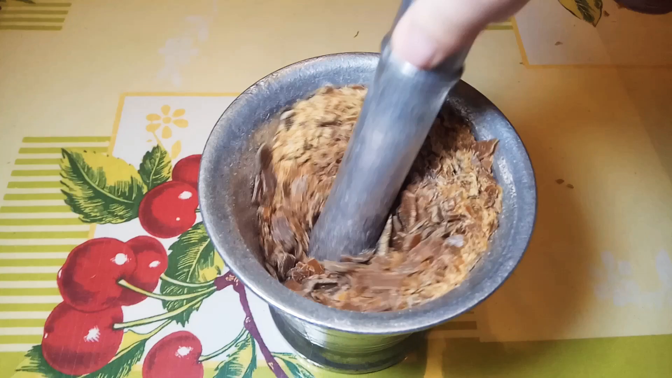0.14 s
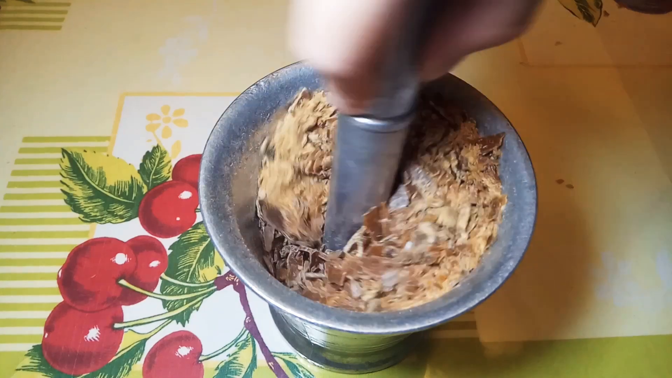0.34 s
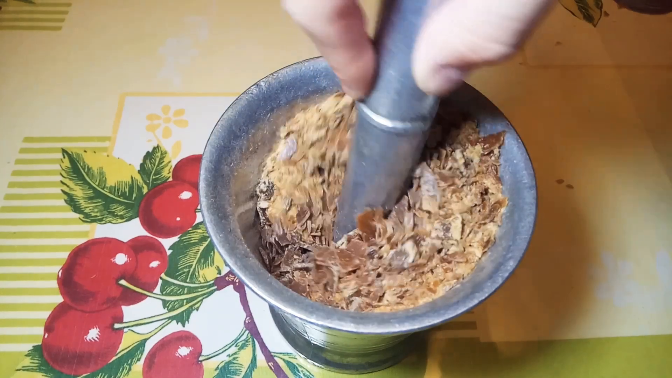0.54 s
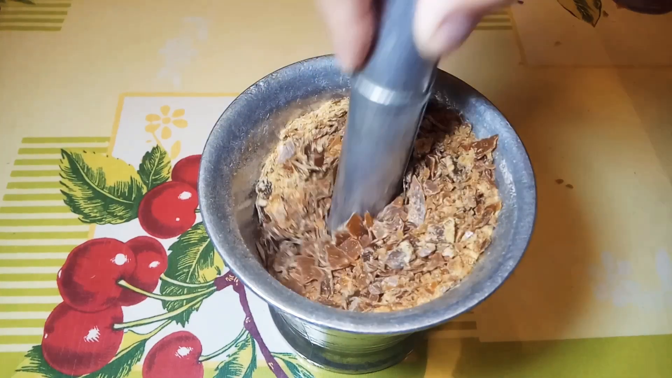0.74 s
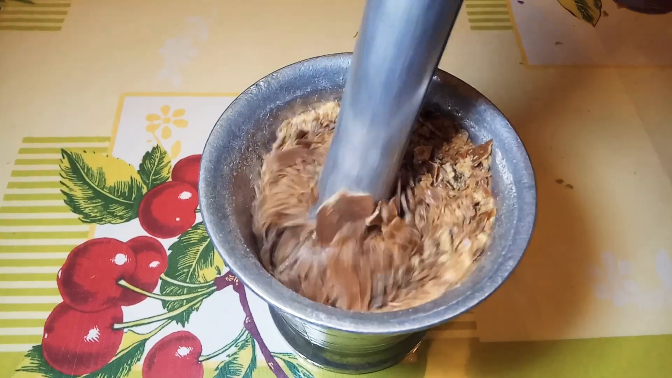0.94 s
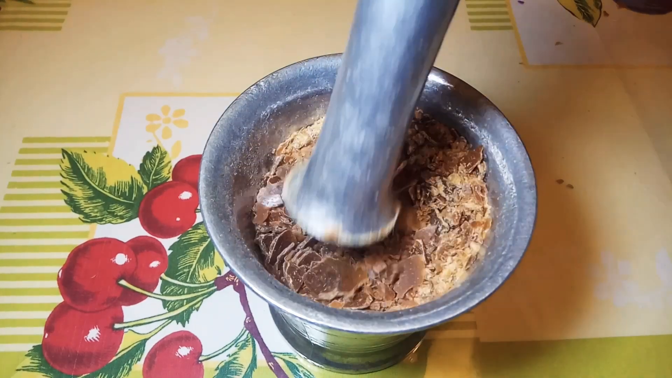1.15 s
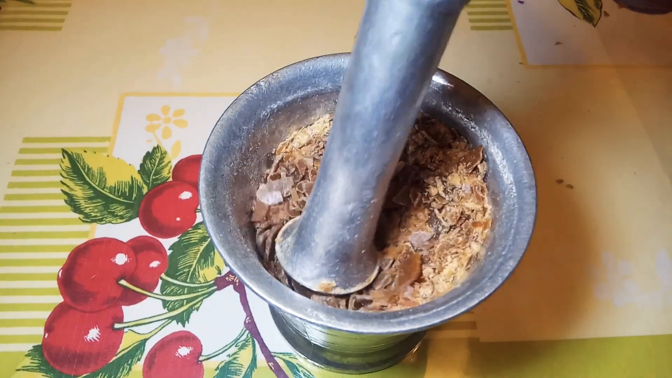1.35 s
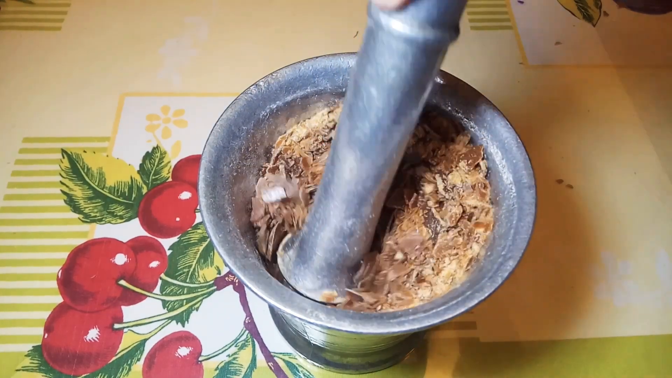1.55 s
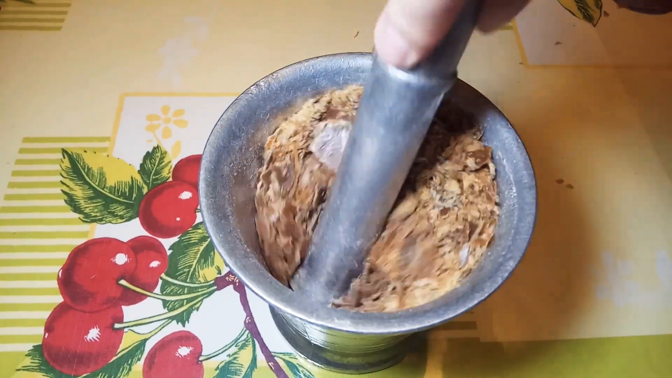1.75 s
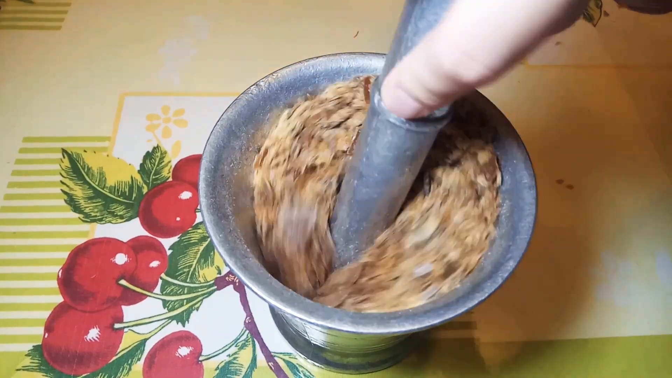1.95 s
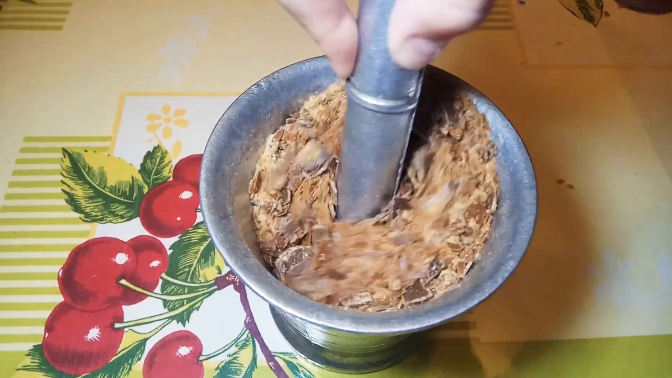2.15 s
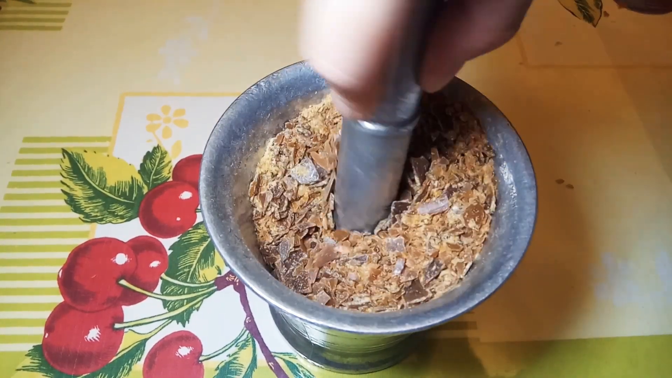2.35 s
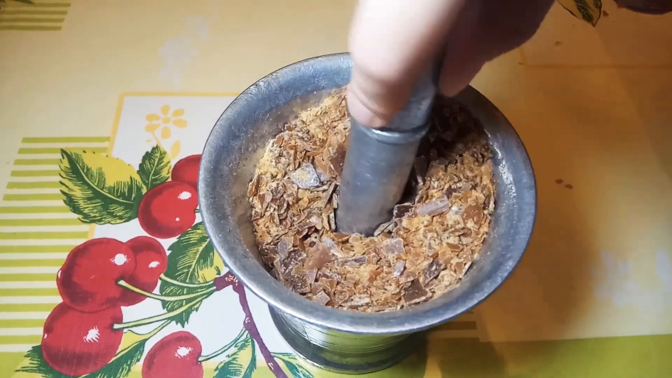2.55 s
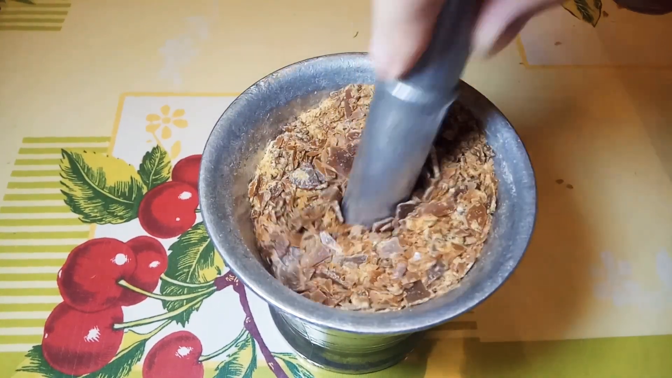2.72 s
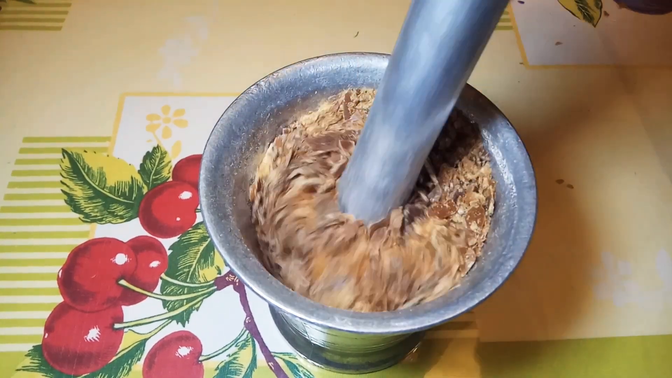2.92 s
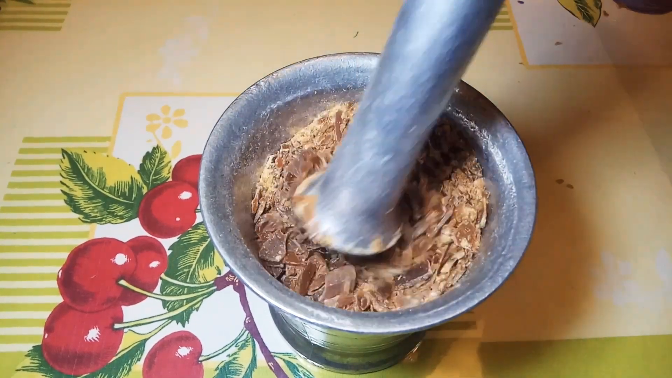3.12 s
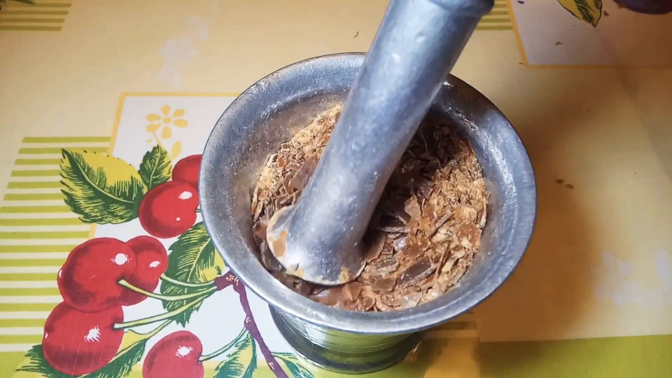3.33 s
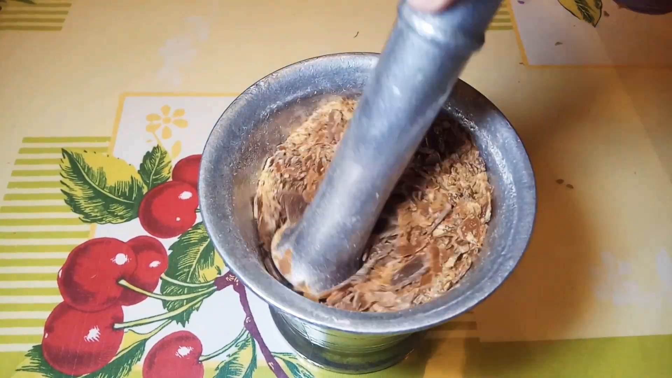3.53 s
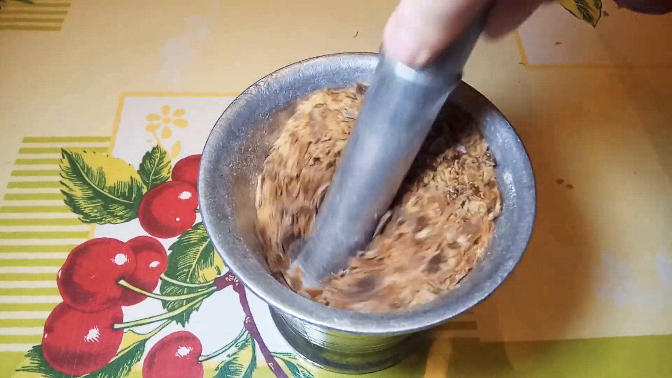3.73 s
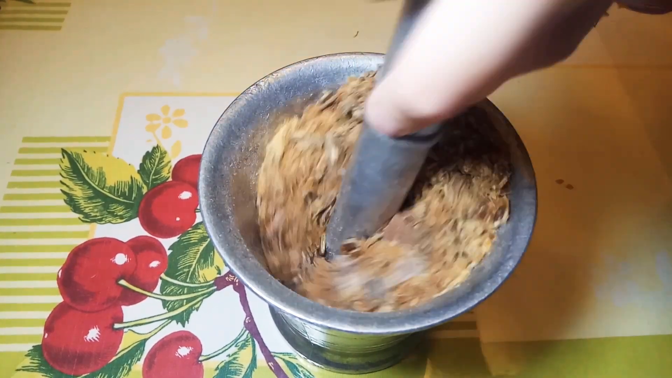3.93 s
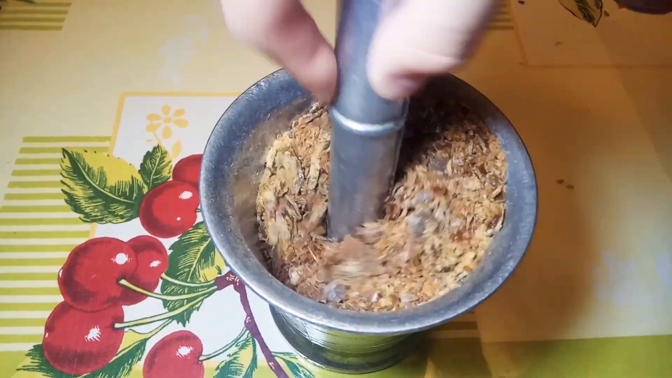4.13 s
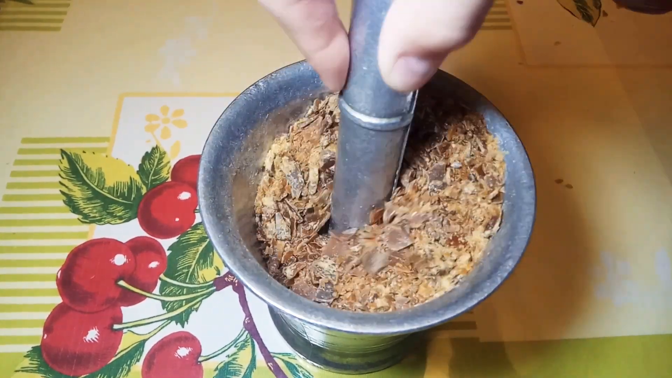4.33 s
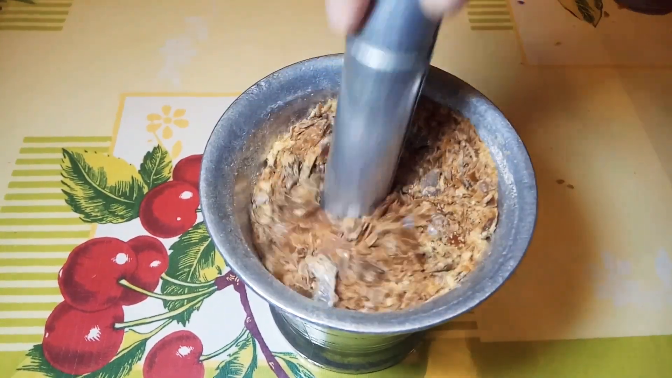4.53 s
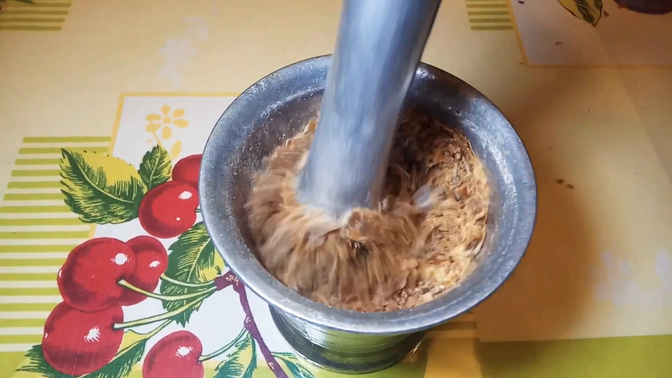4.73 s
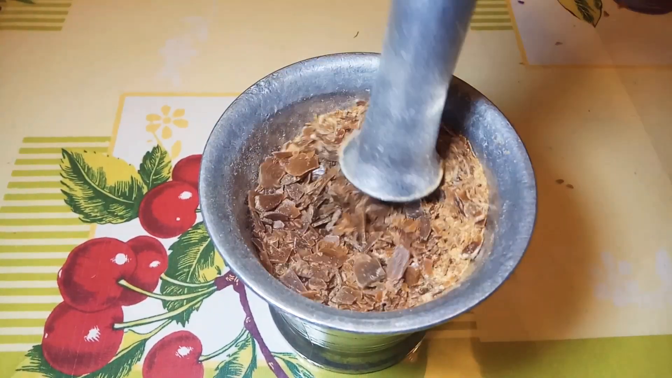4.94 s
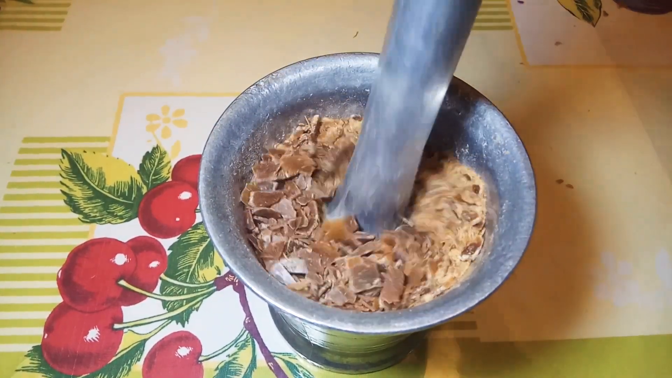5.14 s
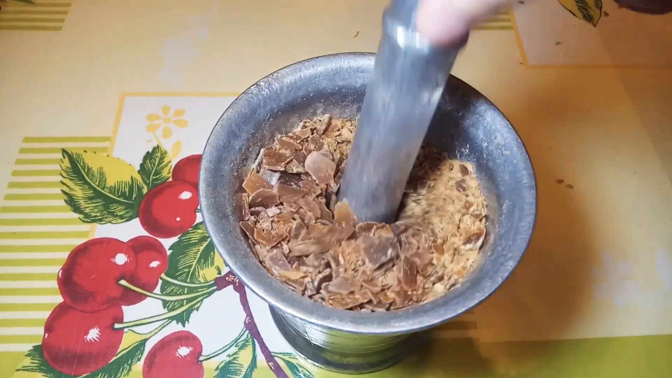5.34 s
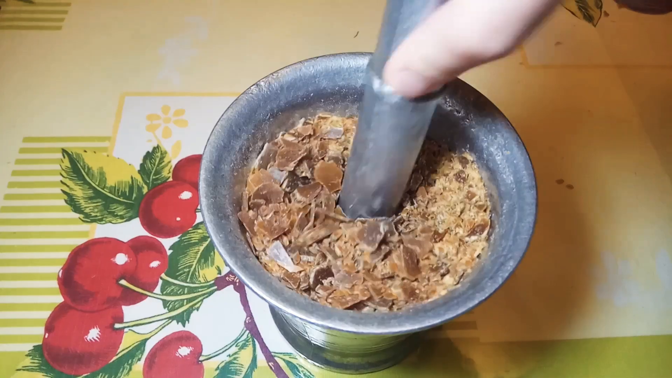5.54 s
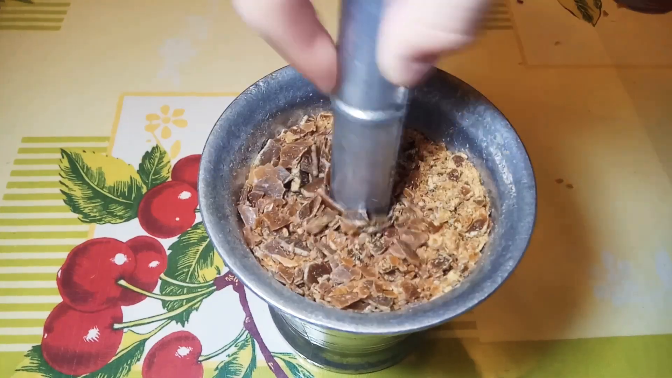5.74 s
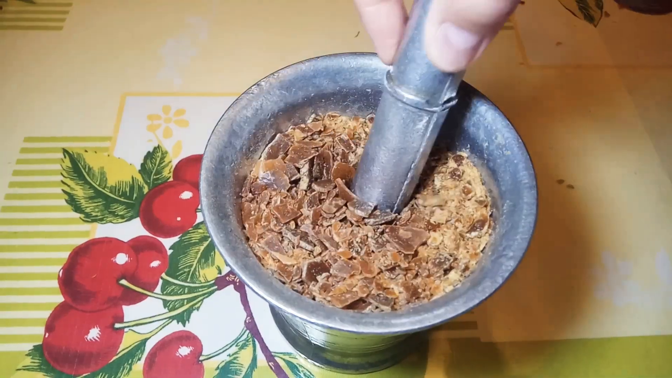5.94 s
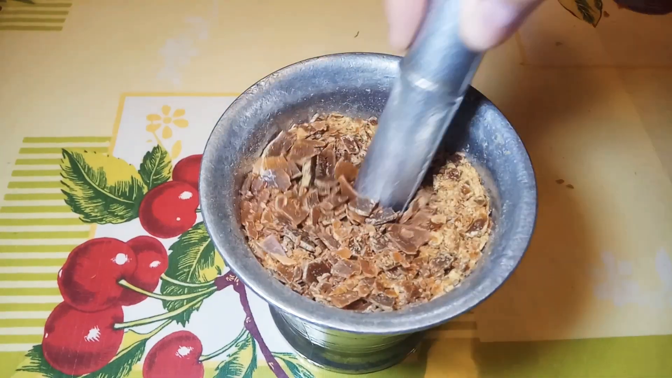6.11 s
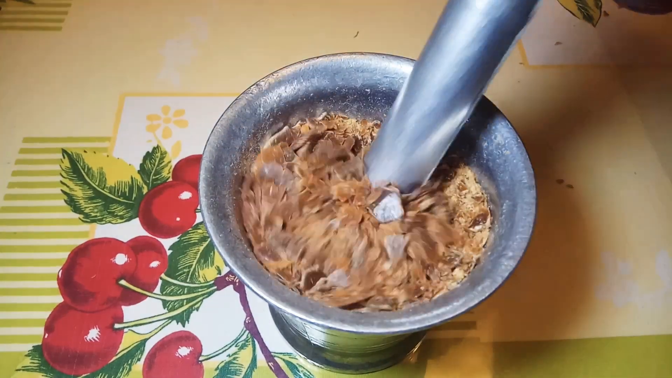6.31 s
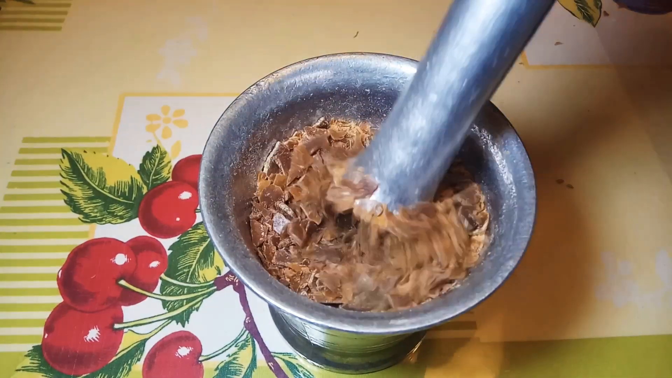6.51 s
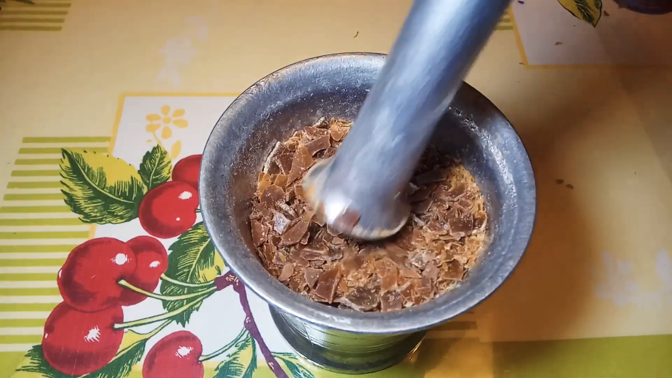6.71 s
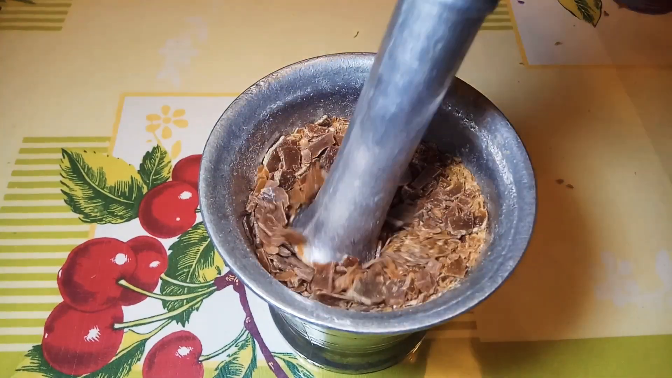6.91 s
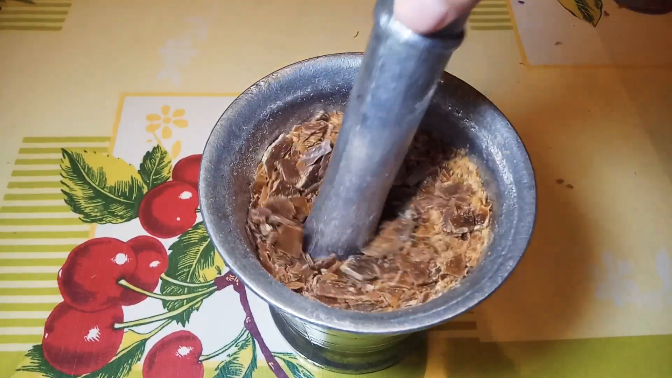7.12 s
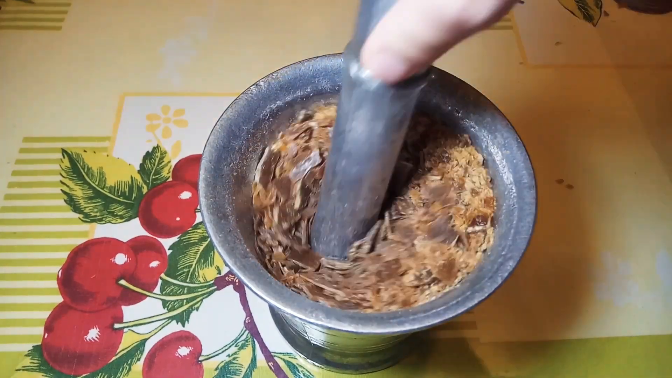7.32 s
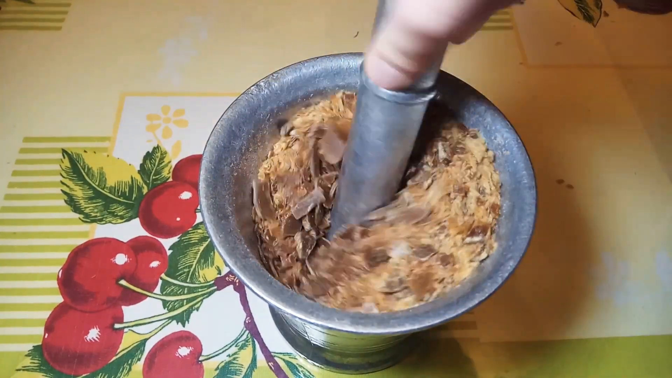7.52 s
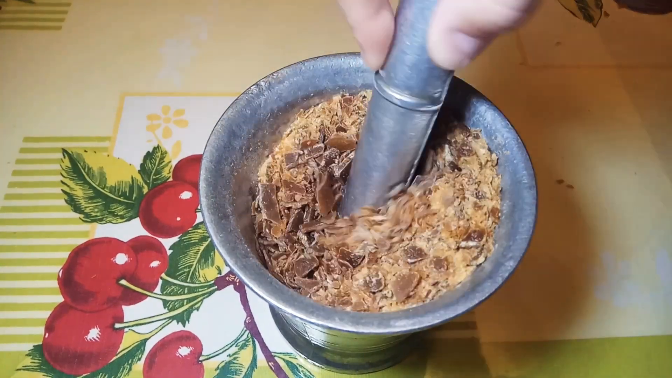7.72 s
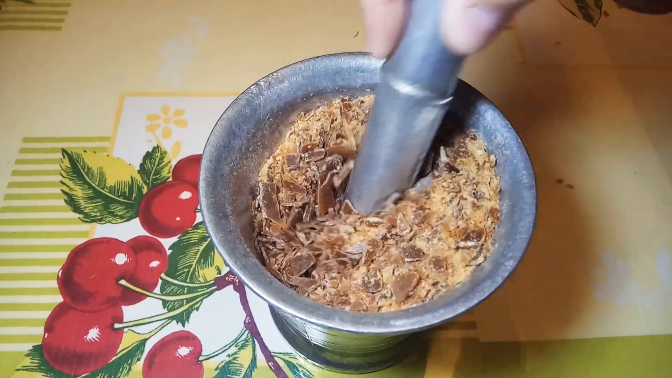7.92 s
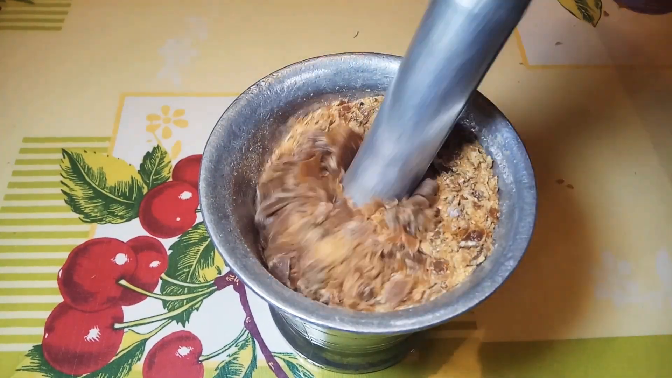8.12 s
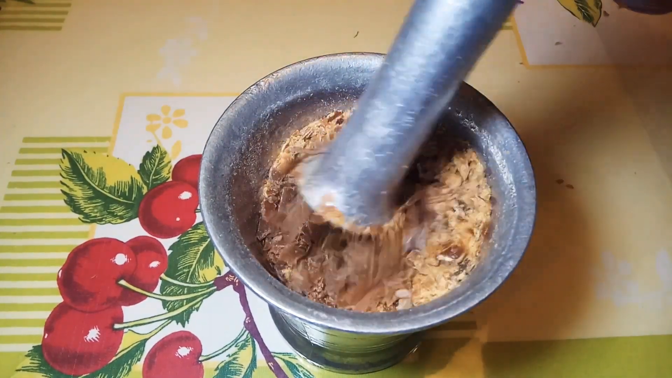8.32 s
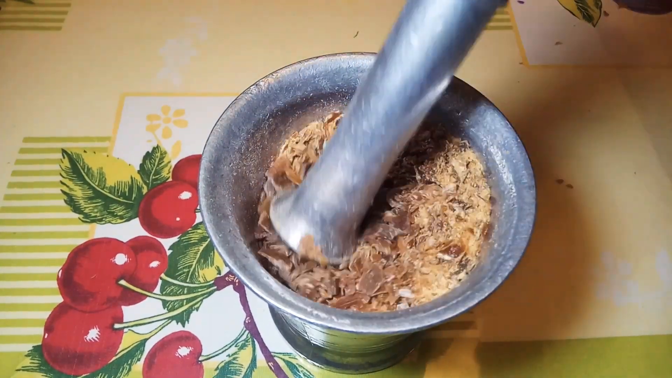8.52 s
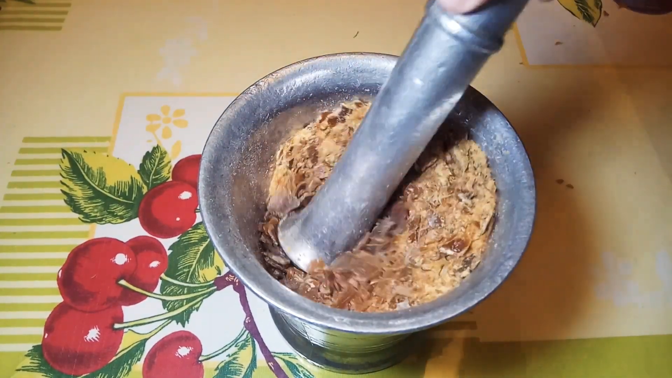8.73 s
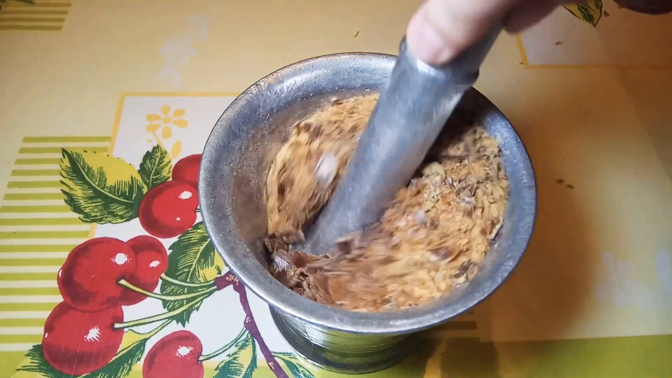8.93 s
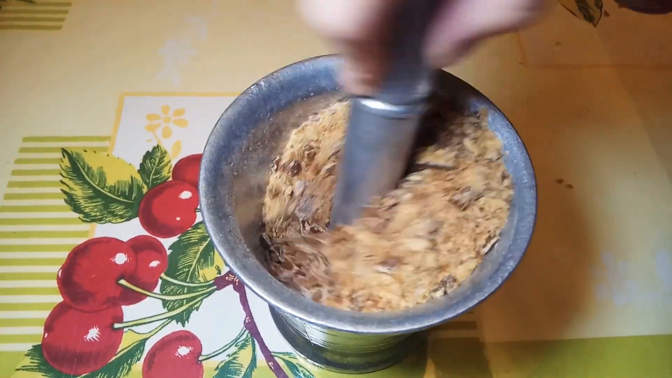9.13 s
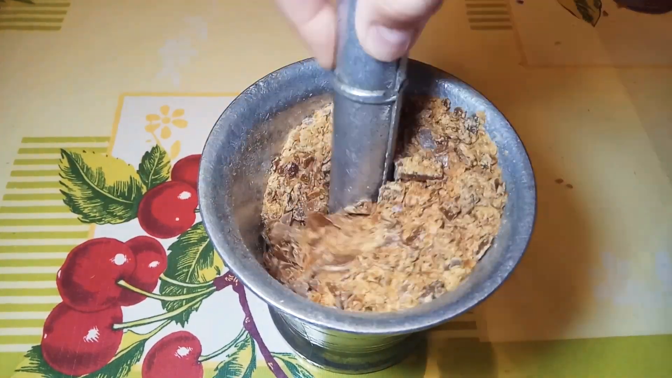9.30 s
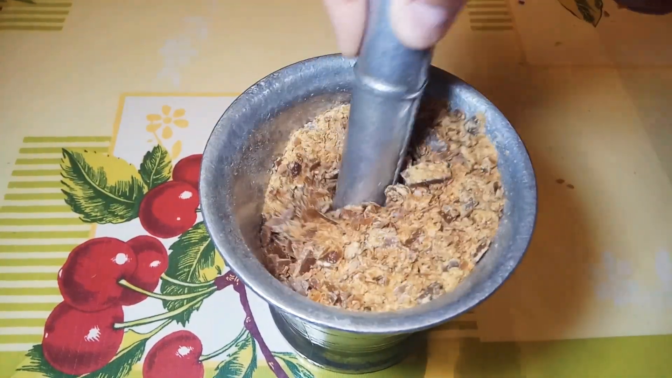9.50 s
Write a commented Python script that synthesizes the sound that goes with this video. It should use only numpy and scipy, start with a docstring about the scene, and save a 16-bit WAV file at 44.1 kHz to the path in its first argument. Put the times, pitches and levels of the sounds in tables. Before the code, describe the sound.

A metal pestle crunches dry brittle flakes in a metal mortar, low table rumble under each press, rustling scrapes and small metallic clinks between.

```python
"""A low rumble and crackle open the scene: a metal pestle presses dry soap flakes in a metal mortar.
Crushing jolts drive the damped modes of the table, and breaking flakes give clumped, filtered clicks.
The pestle is dragged out after most of the presses: sliding flakes rustle and ring mortar and pestle.
Hard shards tap the metal now and then; a thin steady hiss with a wavering whine lies below."""
import sys
import numpy as np
from scipy import signal
from scipy.fft import rfft, irfft
from scipy.io import wavfile
from scipy.ndimage import uniform_filter1d, map_coordinates

SR = 44100
rng = np.random.default_rng(int(sys.argv[2]) if len(sys.argv) > 2 else 0)


def wav_record(signal):
    """Record a signal, one row per channel, as 16-bit PCM in the file named by sys.argv[1]."""
    frames = np.transpose(np.atleast_2d(signal))
    bounded = np.clip(frames, -1, 1)
    # unit amplitude maps onto the largest positive 16-bit level
    quanta = np.round(bounded * 32767).astype(np.int16)
    wavfile.write(sys.argv[1], SR, quanta)


N = 426006

# Levels of forces and bursts are drive levels, before filters and resonators.
# pressing down: (touch [s], full weight [s], easing [s], lifted [s], table rumble [dB], crunch [dB],
# rustle [dB], mortar ring [dB]); levels at full weight
PRESSES = [(-0.08, 0.33, 0.41, 0.69, -38, -48, -55.5, -63), (1.372, 2.02, 2.165, 2.355, -44, -55, -58, -74),
           (2.294, 2.42, 2.456, 2.577, -50.5, -51, -79, -72),
           (3.464, 3.864, 4.155, 4.396, -43.5, -56, -60, -67),
           (5.014, 5.52, 5.68, 6.155, -40.5, -54.5, -58.5, -62),
           (6.844, 7.486, 7.66, 7.93, -43.5, -57, -62.5, -71),
           (8.508, 9.166, 9.26, 9.44, -40, -51, -59, -66)]
# dragging out and across: (start [s], fastest [s], slowing [s], still [s], rustle [dB], mortar ring [dB],
# pestle ring [dB], table rumble [dB]); in two rows slowing and still overlap, so the drag breaks off abruptly
DRAGS = [(0.692, 1.061, 1.118, 1.42, -50, -59.5, -79, -60.5),
         (2.615, 3.03, 3.17, 3.37, -52.5, -64, -90, -62), (3.226, 3.353, 3.6, 3.46, -58, -84, -88, -59),
         (4.42, 4.766, 4.82, 5.24, -50.5, -58.5, -70.5, -57),
         (6.155, 6.43, 6.556, 7.05, -54.5, -68, -90, -53),
         (7.914, 8.224, 8.8, 8.56, -54, -63.5, -84.5, -62.5)]
# modes of the table top under the mortar: (frequency [Hz], level [dB], t60 [s])
TABLE_MODES = [(73.6, -9.5, 0.06), (141, 1.5, 0.1), (182.2, -1, 0.091), (240.6, 2, 0.094), (319, -2, 0.095),
               (378.4, 1, 0.083), (481, -3.5, 0.045), (568.3, -8, 0.068), (1290, -12, 0.016)]
# short first swing of a table jolt: (frequency [Hz], level [dB], t60 [s])
THUD_MODES = [(373, 7.5, 0.019)]
# flakes that snap: (time [s], crack level [dB], table jolt level [dB], treble tick level [dB])
SNAPS = [(0.086, -34, -50, -47), (0.11, -33.5, -43, -43.5), (0.199, -34, -46, -45), (0.3633, -52, -37, -64),
         (0.4197, -49, -52, -61), (1.9032, -37, -65, -39.5), (2.002, -32.5, -35.5, -68),
         (2.068, -37, -34.5, -38), (2.0988, -42, -34, -66), (2.4297, -60, -41.5, -80),
         (2.6797, -47, -81, -82), (3.512, -53, -54, -45.5), (3.7585, -31, -41, -48),
         (3.829, -33.5, -50, -66), (3.8773, -33, -39.5, -68), (3.928, -39, -38, -50),
         (3.9955, -44, -31.5, -52), (4.1, -23, -39.5, -66), (4.2069, -38, -38, -75),
         (4.23, -59, -33.5, -75), (4.419, -41, -82, -82), (4.449, -42, -85, -83), (5.317, -37, -48, -44),
         (5.5052, -27.5, -33, -50), (7.315, -34.5, -51.5, -55), (7.3487, -31.5, -42.5, -54),
         (7.3891, -32.5, -56.5, -64.5), (7.4204, -35, -61, -53), (7.4496, -29, -38, -47),
         (7.4794, -44, -36.5, -70), (7.5216, -29, -29, -71), (7.899, -40, -65, -87), (8.516, -57, -74, -43),
         (8.932, -33.5, -48.5, -46), (9.051, -36.5, -60, -36.5), (9.193, -32, -30.5, -49),
         (9.2523, -63, -31, -67)]
# spectrum that colours the crunch: (frequency [Hz], relative level [dB])
CRUNCH_SPECTRUM = [(300, -5), (550, 2.5), (900, 4.5), (1500, -7.5), (2200, -18), (4000, -41.5), (8000, -38)]
# spectrum that colours rustle and treble ticks: (frequency [Hz], relative level [dB])
RUSTLE_SPECTRUM = [(600, -43.5), (1000, -20), (2400, -12.5), (4600, -9), (6000, -3.5), (7000, -11.5),
                   (8000, -17), (13600, -10.5), (14500, -2.5), (15500, -9)]
# resonances of the bowl in the rustle, the second left level: (frequency [Hz], width [Hz], lift [dB])
BOWL_RESONANCES = [(1248, 96, 10.5), (5960, 310, 0)]
# pitch of each size class of middling flakes: (frequency [Hz])
CRACKLE_PITCHES = [900, 1400, 2000, 2900, 4100]
# mortar modes, the first two a close pair: (frequency [Hz], level [dB], t60 [s])
MORTAR_MODES = [(2085, 0, .1), (2200, -2, .1), (5860, -9, .05)]
# pestle modes: (frequency [Hz], level [dB], t60 [s])
PESTLE_MODES = [(4250, 0, .1), (7230, 0, .15), (10692, -9, .2), (10983, -13, .15), (14320, -11, .15),
                (14447, 1, .2)]
# hard shards striking metal: (time [s], lowest pestle mode level [dB], mortar level [dB],
# upper pestle modes level [dB])
TAPS = [(0.1096, -48, -49.5, -58), (0.9053, -50.5, -72, -73), (0.982, -61, -48, -67),
        (1.026, -48, -49, -44.5), (1.066, -45, -52, -54), (1.1534, -64, -48.5, -52), (1.41, -57, -61, -87),
        (2.222, -56, -80, -73), (2.6790, -55, -55, -80), (3.0243, -53, -52, -69), (3.0774, -50, -53.5, -58),
        (3.361, -49.5, -70, -69), (3.508, -47.5, -54, -66), (4.4494, -63, -58, -70), (4.745, -44, -69, -69),
        (4.7824, -50, -51, -55), (4.8199, -36, -48.5, -45), (4.8538, -36.5, -56, -39.5),
        (4.8938, -35.5, -47, -44.5), (6.569, -46, -58, -50.5), (8.2375, -38, -56.5, -58),
        (8.4686, -42, -60, -57)]
# spectrum of the hiss: (frequency [Hz], relative level [dB])
HISS_SPECTRUM = [(30, -17.5), (90, -5.5), (200, -8.5), (400, -18), (1100, -28), (3600, -20.5), (7000, -17),
                 (8000, -60), (13500, -57.5), (14500, -37), (15500, -19)]

TOUCH_S = 0.017   # each sound jumps to a light level at the touch, then grows with the weight
TOUCH_RUMBLE_DB, TOUCH_CRUNCH_DB, TOUCH_RUSTLE_DB, TOUCH_RING_DB = -55, -85, -66.5, -81
REST_DB, CRUNCH_REST_DB = -73.5, -94.5   # rumble and crunch between the moves
STILL_DB, RING_STILL_DB, BRUSH_STILL_DB = -76, -92, -110   # rustle, mortar, pestle between the moves
SETTLE_SHARE = .55   # rustle and ring of a press die within this share of the release
DRAG_CRUNCH_DB = -29   # crunch under the rustle of a drag
EARLY_RING_DB = -1   # mortar ring early in a drag against its height
BRUSH_LEAD_S = 0.2   # pestle ring starts this long before the drag is fastest
SHOVE_S = 0.24   # table rumble rises within this time of the start of a drag
CONTACT_REST, CONTACT_TOUCH = 0.28, 0.24   # share of upper table modes; the rest share is the floor
DEEP_FADE_DB = -4   # the deep table modes fade by this from full weight onward, through the easing
LOOSE_JOLT_DB, PINNED_JOLT_DB = -62, -50   # jolt below which a crack is thin, above which it is full
CRACK_MAKEUP_DB, TICK_MAKEUP_DB = 23, 22.5   # level lost in the band filters
CRACKLE_PER_S, CRACKLE_DB = 110, 3   # clicks in each size class; level against the rustle of a press
CRACKLE_CYCLES = 5   # a crackle tick falls by 60 dB within this many cycles
FLUTTER_DB = 1.5   # spread of the swelling and sinking of the rustle
TOP_NOISE_DB = -7.5   # noise at the microphone's resonance, against the rustle of a press
LAG = 14   # samples by which the right microphone hears the flakes late
TAP_SKID_S = 0.007   # decay constant of the burst as a shard skids along the metal
HISS_DB, WHINE_DB = -69.5, -65.5
WHINE_HZ, WHINE_WIDTH_HZ = 14925, 60
ROOM_T60_S, ROOM_DB = 0.22, -3.5
CUTOFF_HZ = 15480


def amp(db):
    """Decibel law: the amplitude gain of a level in dB."""
    return 10 ** (np.asarray(db) / 20)


def rms_one(x):
    """Power normalisation: scale a signal to rms 1."""
    return x / np.sqrt(np.mean(x ** 2) + 1e-20)


def drift(rate):
    """Band-limited chance: splined random knots turn about this often a second, with spread near 1."""
    knots = rng.standard_normal(1000)
    return map_coordinates(knots, [np.arange(N) / SR * rate * 2], order=3)


def colour(x, spectrum):
    """Minimum-phase principle: the folded cepstrum of a spectrum gives a causal filter."""
    hz, level_db = np.transpose(spectrum)
    grid = np.linspace(1, SR / 2, 4097)
    log_gain = np.interp(np.log(grid), np.log(hz), level_db) * np.log(10) / 20
    cepstrum = irfft(log_gain)
    cepstrum[1:4096] *= 2
    cepstrum[4097:] = 0
    kernel = irfft(np.exp(rfft(cepstrum)))
    return signal.oaconvolve(x, kernel[None] / np.linalg.norm(kernel), axes=1)[:, :N]


def band(x, low_hz, high_hz):
    """Band limitation: a first-order Butterworth band-pass with gentle slopes."""
    sos = signal.butter(1, [low_hz, min(high_hz, .45 * SR)], "band", fs=SR, output="sos")
    return signal.sosfilt(sos, x + 1e-18)


def grains(per_s, spread_db, clump_db, channels=1):
    """Shot noise: random clicks of uneven size and either sign, swelling in clumps; rms 1."""
    born = rng.random((channels, N)) < per_s / SR
    draws = rng.random((2, born.sum()))
    size_db = spread_db * np.minimum(-np.log(1 - draws[0]), 6)
    out = np.zeros((channels, N))
    out[born] = amp(size_db) * np.sign(draws[1] - .5)
    return rms_one(out * amp(clump_db * drift(14)))


def struck(force, modes):
    """Modal superposition: a force drives damped resonators, summed with alternating sign."""
    out = 0
    for k, (hz, level_db, t60) in enumerate(modes):
        radius = amp(-60 / (t60 * SR))
        angle = 2 * np.pi * hz / SR
        poles = [1, -2 * radius * np.cos(angle), radius * radius]
        ring = signal.lfilter([0, np.sin(angle)], poles, force + 1e-18)
        out = out + (-1) ** k * amp(level_db) * ring
    return out


def blows(times, levels_db, channels=1, burst_s=.002):
    """Impulsive excitation: a sharp front and a decaying noise burst of splinters, of set energy."""
    size = 900
    out = np.zeros((channels, N + size))
    fade = np.exp(-np.arange(size) / (burst_s * SR))
    for s, level_db in zip(times, levels_db):
        at = round(s * SR)
        burst = fade * rng.standard_normal((channels, size))
        burst[:, 0] = 1.22 + .25 * np.sqrt(burst_s * SR)
        out[:, at:at + size] += amp(level_db) * burst / np.linalg.norm(burst, axis=1, keepdims=True)
    return out[:, :N]


def moves(rows, rest_db):
    """Piecewise-linear envelope: moves rise from rest through their points; the strongest counts."""
    t = np.arange(0, N / SR + .002, .002)
    level = np.max([np.interp(t, times, [rest_db, *levels, rest_db]) for times, levels in rows], axis=0)
    return np.interp(np.arange(N) / SR, t, level)


def pressing(column, touch_db, rest_db, settle=1):
    """Loading cycle: one level column of the presses through touch, growth, hold and release."""
    rows = []
    for row in PRESSES:
        touch, full, easing, lifted = row[:4]
        db = row[column]
        times = (touch, touch + TOUCH_S, full, easing, easing + settle * (lifted - easing))
        rows.append((times, (min(touch_db, db), db, db)))
    return moves(rows, rest_db)


def contact():
    """Contact stiffness: packed flakes pass the upper modes; the deep ones fade from full weight onward."""
    hard_rows, fade_rows = [], []
    for touch, full, easing, lifted, *_ in PRESSES:
        hard_rows.append(((touch, touch + TOUCH_S, full, lifted, lifted + 0.13), (CONTACT_TOUCH, 1, 1)))
        fade_rows.append(((full, easing + 0.11 * (lifted - easing), lifted, lifted + 0.03), (1, 1)))
    hard = moves(hard_rows, CONTACT_REST)
    return np.clip(hard, .05, 1), amp(DEEP_FADE_DB * moves(fade_rows, 0))


def dragging():
    """Sliding excitation: levels of rustle, mortar ring, pestle ring and table rumble in the drags."""
    rustle, ring, brush, shove = [], [], [], []
    for start, fast, slow, still, rustle_db, ring_db, brush_db, shove_db in DRAGS:
        early = min(start + SHOVE_S, fast - .01)
        rustle.append(((start, fast, slow, still), (rustle_db, rustle_db)))
        ring.append(((start, early, fast, slow, still), (ring_db + EARLY_RING_DB, ring_db, ring_db)))
        brush.append(((fast - BRUSH_LEAD_S, fast, slow, still), (brush_db, brush_db)))
        shove.append(((start, early, fast, slow + 0.034), (shove_db, shove_db)))
    return (moves(rustle, STILL_DB), moves(ring, RING_STILL_DB),
            moves(brush, BRUSH_STILL_DB), moves(shove, REST_DB))


def freedom():
    """Change of loading: -1 while the pestle is under the heap, 1 once it is free."""
    return moves([((fast - BRUSH_LEAD_S, fast - .05, still, still + .1), (1, 1))
                  for start, fast, slow, still, *_ in DRAGS], -1)


def table(rumble_db, times, jolt_db):
    """Structure-borne sound: crushing jolts drive table modes, moving the microphones in opposite sense."""
    force = amp(rumble_db) * grains(900, 2.83, 2.14, channels=2)
    jolts = blows(times, jolt_db, burst_s=.00001)[0]
    force[0] += amp(13.0) * band(jolts, 170, 1500)
    scale = np.std(struck(rng.standard_normal(SR), TABLE_MODES))
    shake, loose = struck(force, TABLE_MODES) / scale
    # light contact is soft and stirs mainly the deep modes
    hard, push = contact()
    deep = signal.sosfilt(signal.butter(2, 190, fs=SR, output="sos"), shake)
    thud = struck(band(jolts, 81, 1600), THUD_MODES)
    shake = push * deep + hard * (shake - deep) + thud
    # the right side follows late in the upper modes and has some shaking of its own
    late = signal.lfilter(*signal.butter(1, 800, fs=SR), shake)
    return np.array([3.9 * shake, -2.0 * late + 0.34 * band(loose, 25, 2000)])


def shards(per_s, spread_db, clump_db, spectrum, common):
    """Size-pitch scaling: clicks in octave bands, partly shared and partly each side's own."""
    edges = 300 * 2 ** np.arange(0, 7)
    ticks = 0
    for low, high in zip(edges, edges[1:]):
        shared, *own = grains(per_s, spread_db, clump_db, channels=3)
        both = np.array([shared, np.roll(shared, LAG)])
        ticks = ticks + band(np.array(own) + common * both, low, high)
    return rms_one(colour(ticks, spectrum))


def crunch(crunch_db):
    """Granular fracture: sparse, strongly clumped clicks, dull and stronger on the left."""
    return amp(crunch_db) * shards(400, 4.6, 9.7, CRUNCH_SPECTRUM, common=0.65) * amp([[3.0], [-1.5]])


def bowl_resonance(x):
    """Resonance: a narrow bowl resonance near 1250 Hz is lifted; the one near 6 kHz is left level."""
    return x + sum((amp(db) - 1) * band(x, hz - width / 2, hz + width / 2)
                   for hz, width, db in BOWL_RESONANCES)


def rustle(rustle_db):
    """Granular flow: dense clicks coloured by the bowl swell and sink as flakes tumble."""
    level = amp(rustle_db + FLUTTER_DB * drift(6.4))
    flakes = bowl_resonance(shards(1800, 3.3, 2.8, RUSTLE_SPECTRUM, common=0.18))
    return level * flakes * amp([[1.5], [-1.5]])


def microphone_resonance(stir_db):
    """Resonance: a narrow noise band at 14.2-15.6 kHz, the microphone's, follows the rustle of a press."""
    noise = grains(3000, 3.0, 3.0, channels=2)
    for _ in range(2):
        noise = band(noise, 14200, 15600)
    return amp(stir_db + TOP_NOISE_DB) * rms_one(noise)


def crackle(stir_db):
    """Brittle fracture: middling flakes break in clumps, each a damped tick at the pitch of its size."""
    ticks = 0
    for hz in CRACKLE_PITCHES:
        clicks = grains(CRACKLE_PER_S, 4.0, clump_db=3.5)[0]
        ticks = ticks + band(struck(clicks, [(hz, 0, CRACKLE_CYCLES / hz)]), hz / 2, hz * 2)
    both = rms_one(np.array([ticks, np.roll(ticks, LAG)]))
    return amp(stir_db + CRACKLE_DB) * both * amp([[1.5], [-1.5]])


def mortar(scrape_db):
    """Friction-driven modes: sliding flakes ring a pair; the lower gains as the pestle comes free."""
    lead, out = 5.0 * freedom() + 2.5 * drift(1.494), 0
    for mode, share_db in zip(MORTAR_MODES, (lead, -lead)):
        force = amp(share_db) * grains(900, 3.0, clump_db=2.0, channels=2)
        out = out + struck(force, [mode])
    # running rms is levelled so that the scrape level alone sets the loudness
    level = np.sqrt(uniform_filter1d(np.mean(out ** 2, axis=0), size=SR // 3))
    return amp(scrape_db) * out / level


def hiss():
    """Stationary noise: steady coloured hiss, and a narrow noise band whose beating makes a thin whine."""
    noise = rng.standard_normal((4, N))
    whine = band(noise[2:], WHINE_HZ - WHINE_WIDTH_HZ / 2, WHINE_HZ + WHINE_WIDTH_HZ / 2)
    steady = rms_one(colour(noise[:2], HISS_SPECTRUM))
    return amp(HISS_DB) * steady + amp(WHINE_DB) * rms_one(whine)


def room(x):
    """Diffuse reverberation: convolution with an exponentially dying noise tail, other in each channel."""
    t = np.arange(SR // 2) / SR
    tail = rng.standard_normal((2, len(t))) * amp(-60 * t / ROOM_T60_S) * (t > .003)
    return amp(ROOM_DB) * signal.oaconvolve(x, tail / np.linalg.norm(tail[0]), axes=1)[:, :N]


def cracks(times, crack_db, jolt_db, tick_db):
    """Sudden fracture: a snapping flake cracks, full under load and thin when loose, and ticks high."""
    pinned = np.interp(jolt_db, (LOOSE_JOLT_DB, PINNED_JOLT_DB), (.02, .98))
    crack = 0
    for share, low_hz, high_hz in ((pinned, 500, 2800), (1 - pinned, 2000, 6500)):
        level_db = crack_db + CRACK_MAKEUP_DB + 10 * np.log10(share)
        burst = blows(times, level_db, burst_s=.0025)[0]
        both = np.array([burst, np.roll(burst, LAG // 3)])
        crack = crack + band(band(both, low_hz, high_hz), .8 * low_hz, high_hz)
    crack = signal.sosfilt(signal.butter(2, 6500, fs=SR, output="sos"), crack)
    tick = band(blows(times, tick_db + TICK_MAKEUP_DB, channels=2, burst_s=0.0016), 3700, 21000)
    tick = colour(tick, RUSTLE_SPECTRUM)
    # both lie nearer the left side
    return crack * amp([[2.0], [-2.0]]) + tick * amp([[3.0], [-3.0]])


def metal(brush_db):
    """Modal excitation by place: flakes brush the pestle; shards strike it and the mortar at varied spots."""
    times, low_db, mortar_db, upper_db = np.transpose(TAPS)
    brush = amp(brush_db) * grains(900, 3.9, 1.1, channels=2)
    low_taps = blows(times, low_db, channels=2, burst_s=TAP_SKID_S)
    upper_taps = blows(times, upper_db, channels=2, burst_s=TAP_SKID_S)
    mortar_taps = blows(times, mortar_db, channels=2, burst_s=TAP_SKID_S)
    out = struck(brush + low_taps, PESTLE_MODES[:1])
    out = out + struck(amp(-9.5) * brush + upper_taps, PESTLE_MODES[1:])
    lead = 6.0 * freedom()
    for mode, share_db in zip(MORTAR_MODES, (lead - 3, -lead - 3, 0)):
        out = out + struck(amp(share_db) * mortar_taps, [mode])
    return out * amp([[2.0], [-2.0]])


def scene():
    """Superposition: airborne sources with their room tail, table shaking and hiss add in two channels."""
    drag_db, ring_db, brush_db, shove_db = dragging()
    rumble_db = np.maximum(pressing(4, TOUCH_RUMBLE_DB, REST_DB), shove_db)
    crush_db = pressing(5, TOUCH_CRUNCH_DB, CRUNCH_REST_DB)
    stir_db = pressing(6, TOUCH_RUSTLE_DB, STILL_DB, settle=SETTLE_SHARE)
    press_ring_db = pressing(7, TOUCH_RING_DB, RING_STILL_DB, settle=SETTLE_SHARE)
    times, crack_db, jolt_db, tick_db = np.transpose(SNAPS)
    airborne = crunch(np.maximum(crush_db, drag_db + DRAG_CRUNCH_DB))
    airborne = airborne + rustle(np.maximum(stir_db, drag_db))
    airborne = airborne + microphone_resonance(stir_db) + crackle(stir_db)
    airborne = airborne + mortar(np.maximum(press_ring_db, ring_db))
    airborne = airborne + cracks(times, crack_db, jolt_db, tick_db) + metal(brush_db)
    return airborne + room(airborne) + table(rumble_db, times, jolt_db) + hiss()


def record(dry):
    """Band limitation: a steep elliptic low-pass cuts the top."""
    return signal.sosfilt(signal.ellip(12, .5, 70, CUTOFF_HZ, fs=SR, output="sos"), dry)


dry = scene()
out = record(dry)
wav_record(out)
```